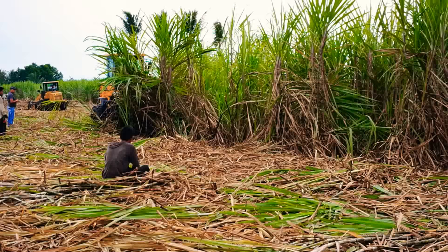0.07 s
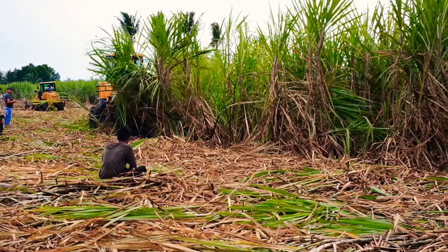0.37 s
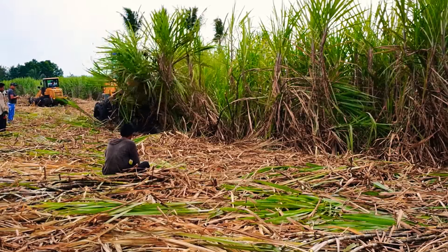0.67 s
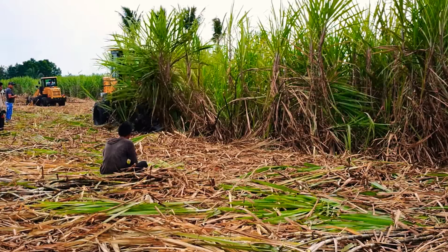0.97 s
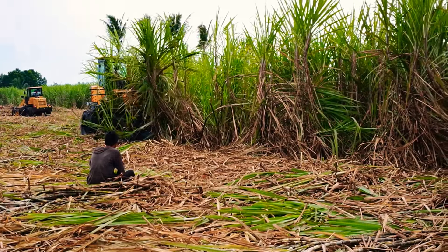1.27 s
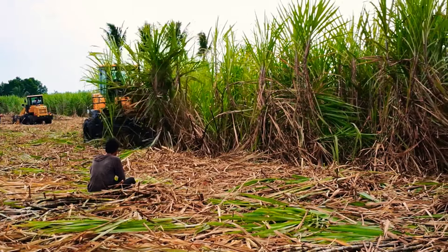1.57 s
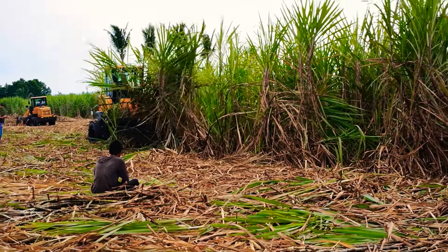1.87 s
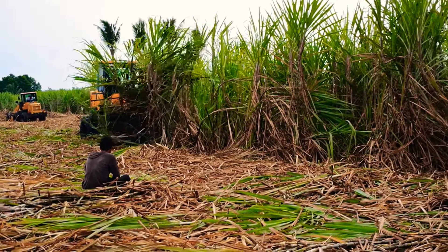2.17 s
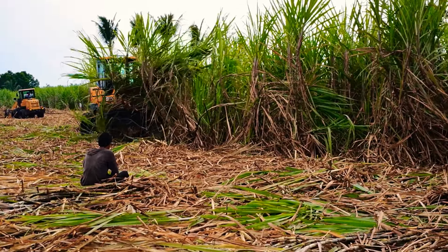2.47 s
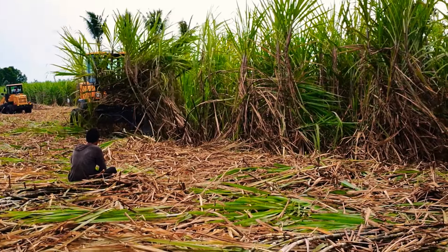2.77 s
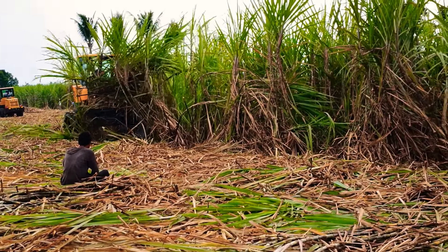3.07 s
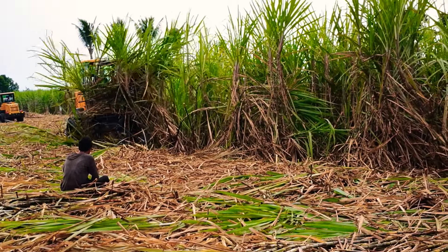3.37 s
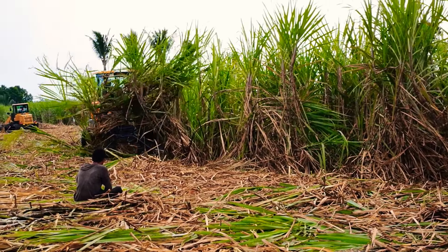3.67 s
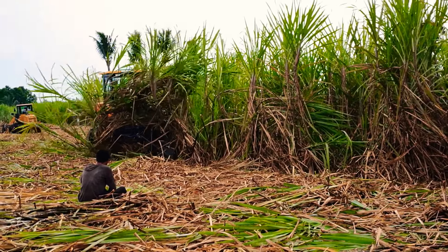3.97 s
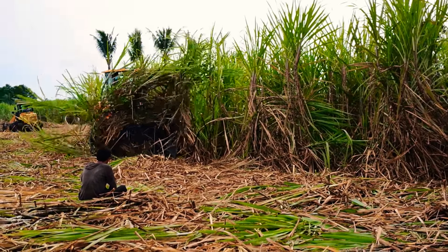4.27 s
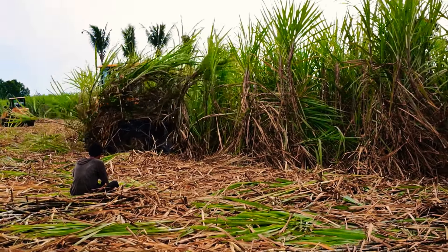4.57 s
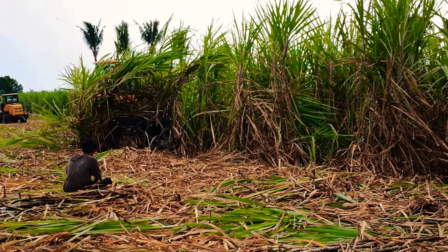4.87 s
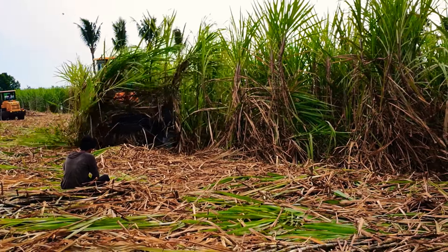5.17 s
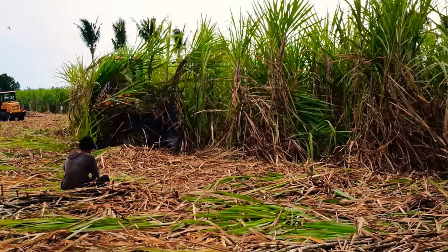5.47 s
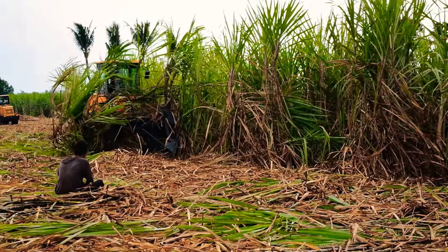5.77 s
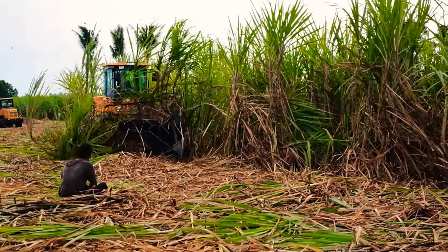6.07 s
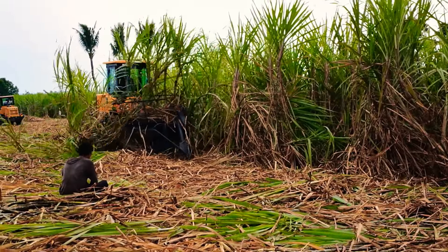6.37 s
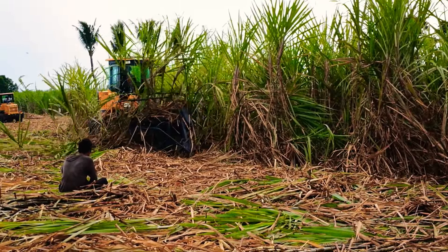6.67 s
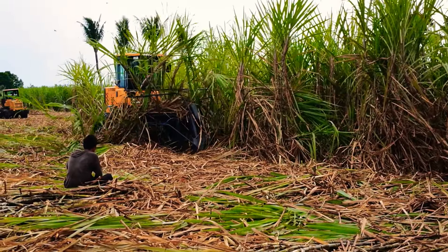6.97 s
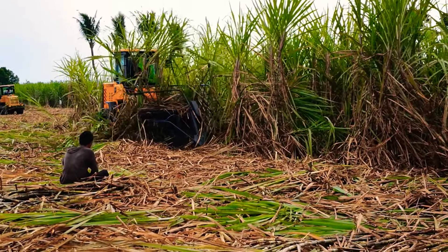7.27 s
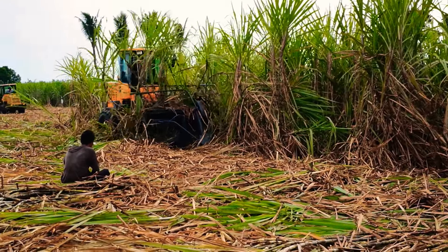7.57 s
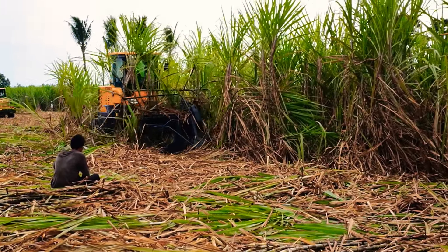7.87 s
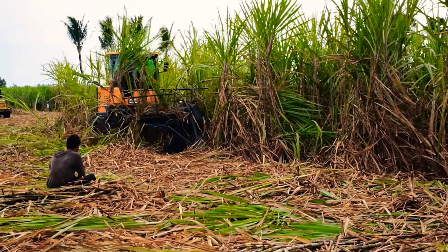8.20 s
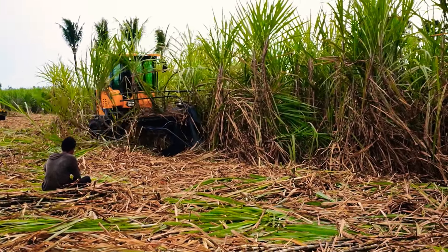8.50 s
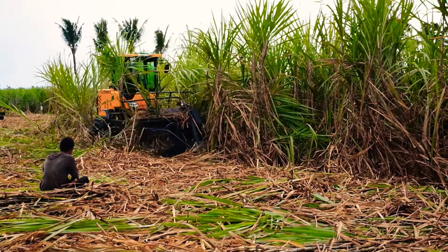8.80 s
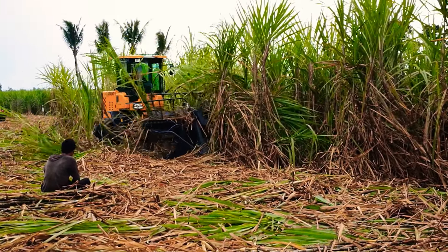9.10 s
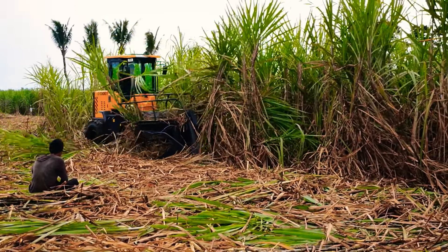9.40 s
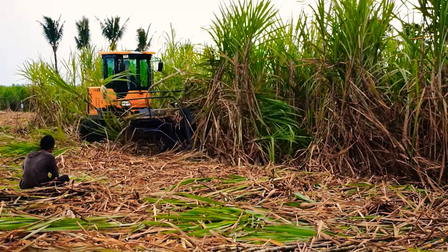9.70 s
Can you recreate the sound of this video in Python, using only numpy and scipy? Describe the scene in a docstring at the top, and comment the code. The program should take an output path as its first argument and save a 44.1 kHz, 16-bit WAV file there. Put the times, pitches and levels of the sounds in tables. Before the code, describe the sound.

Outdoors, a short way from a harvester cutting cane, a low diesel drone fades in quickly and runs on. Brief rising squeaks sound in the first two seconds, followed by a faint pump whine. Throughout, brittle stalks snap irregularly over a hiss of tearing leaves, knocks and rattles on steel panels, and light metallic rings. A distant tractor's hum weakens while the harvester slowly nears.

```python
"""A sugarcane harvester fades in, its four-cylinder diesel droning at the firing rate, a tractor beyond.
In the first two seconds something rubs and squeaks. Then the machine clears the standing cane and
its hydraulic pump whines up. Throughout, billets drum on the steel feed housing, leaves tear in the
fan, stalks fracture with a snap, and now and then a blow rings the modes of a cutter blade.
By the end the harvester has crept closer and the tractor has receded."""
import sys
import numpy as np
from scipy import signal
from scipy.fft import rfft, irfft, next_fast_len
from scipy.io import wavfile

SR = 44100
rng = np.random.default_rng(int(sys.argv[2]) if len(sys.argv) > 2 else 0)


def unload_wav(signal):
    """Save mono or channel-first audio to the path in sys.argv[1] as 16-bit WAV at rate SR, clipped to [-1, 1]."""
    wavfile.write(
        sys.argv[1],
        SR,
        np.round(np.clip(np.atleast_2d(signal).T, -1, 1) * 32767).astype(np.int16),
    )


N = 429534
FFT_SIZE = next_fast_len(N, True)


def from_db(db):
    """Decibels to amplitude ratio."""
    return 10 ** (np.asarray(db) / 20)

def unit_rms(x):
    """Normalisation to unit power."""
    return x / np.sqrt(np.mean(x ** 2) + 1e-20)

def in_time(rows):
    """Interpolation of each column at every sample."""
    s, *columns = np.transpose(rows)
    return [np.interp(np.arange(N) / SR, s, c) for c in columns]

def in_frequency(rows):
    """Interpolation of each column at every bin, along log frequency."""
    hz, *columns = np.transpose(rows)
    bins = np.fft.rfftfreq(FFT_SIZE, 1 / SR)
    return [np.interp(np.log(bins + 1), np.log(hz), c) for c in columns]

def filtered(x, response):
    """Linear filtering: the spectrum times a frequency response."""
    return irfft(rfft(x, FFT_SIZE) * response, FFT_SIZE)[..., :N]

def colour(x, spectrum):
    """Spectral shaping with one-octave skirts; white noise keeps its power."""
    skirted = [(spectrum[0][0] / 2, -70), *spectrum, (spectrum[-1][0] * 2, -70)]
    return filtered(x, unit_rms(from_db(in_frequency(skirted)[0])))

def resonance(x, hz, t60):
    """A damped mode, falling 60 dB in t60 seconds; white noise keeps its power."""
    r, w = from_db(-60 / (t60 * SR)), 2 * np.pi * hz / SR
    gain = np.sqrt((1 - r * r) / 2)
    return signal.lfilter([gain, 0, -gain], [1, -2 * r * np.cos(w), r * r], x)

def drift(corner_hz):
    """Slow fluctuation: low-passed noise of unit rms."""
    step, settling = 40, 2000
    r = np.exp(-2 * np.pi * corner_hz * step / SR)
    noise = rng.standard_normal(N // step + settling + 2)
    slow = signal.lfilter([1], [1, -2 * r, r * r], noise)[settling:]
    return np.interp(np.arange(N) / step, np.arange(len(slow)), unit_rms(slow))

def hiss():
    """Independent white noise on three paths: direct, scattered left, scattered right."""
    return rng.standard_normal((3, N))

def timed_hits(times, db):
    """Impulses of energy at given moments."""
    hits = np.zeros(N)
    hits[(np.asarray(times) * SR).astype(int)] = from_db(db) ** 2
    return hits

def random_hits(per_s, spread_db):
    """A Poisson stream of energy impulses of uneven size."""
    occurs = rng.random(N) < per_s / SR
    return occurs * from_db(spread_db * np.clip(rng.standard_normal(N), -2, 2)) ** 2

def decay(energy, t60, rise_s):
    """Amplitude envelope of energy impulses that build quickly and decay exponentially."""
    tail = signal.lfilter([1], [1, -from_db(-60 / (t60 * SR)) ** 2], energy + 1e-18)
    pole = np.exp(-1 / (rise_s * SR))
    return np.sqrt(signal.lfilter([1 - pole], [1, -pole], tail))

def grains(per_s, spread_db, t60, rise_s):
    """Shot noise: the unit-rms envelope of many small impacts."""
    return unit_rms(decay(random_hits(per_s, spread_db), t60, rise_s))

def phase(hz):
    """Phase angle as the integral of frequency."""
    return 2 * np.pi * np.cumsum(hz) / SR

def partial(angle, order, waver_db):
    """A sinusoid at a multiple of a base rate, wavering about unit rms."""
    tone = np.sqrt(2) * np.sin(order * angle + rng.uniform(0, 2 * np.pi))
    return tone * from_db(waver_db * drift(3.0))


# Each row: time in seconds, firing rate in Hz.
TRACTOR_RATE = [(0, 80.5), (1, 80.2), (2.5, 79.4), (4, 78.3), (5.2, 77.6), (6.5, 77.9), (9.74, 77.8)]
# Each row: multiple of the firing rate, relative level in dB.
TRACTOR_HARMONICS = [(1, -3), (2, -21), (3, -6.5), (4, -17.5), (5, -18)]

def tractor(first_db=-39.0, last_db=-46.0, dulling_db=-2.0):
    """Periodic firing gives a harmonic hum; growing distance takes the upper harmonics first."""
    angle = phase(in_time(TRACTOR_RATE)[0])
    away = np.linspace(0, 1, N)
    hum = sum(from_db(db + dulling_db * (k - 1) * away) * partial(angle, k, waver_db=2.0)
              for k, db in TRACTOR_HARMONICS)
    return from_db(first_db + (last_db - first_db) * away) * hum


# Each row: time in seconds, crankshaft turns per second.
CRANK_RATE = [(0, 25.2), (.5, 25.55), (1.0, 26.0), (1.35, 25.8), (2.1, 27.1), (3.0, 27.2), (4.2, 27.0),
              (4.8, 27.25), (5.6, 27.1), (6.4, 27.0), (6.9, 26.6), (7.7, 26.85), (8.3, 26.7), (8.9, 26.8),
              (9.3, 27.0), (9.74, 26.75)]
# Each row: time in seconds, then relative levels in dB of the firing note, its twelfth and the rumble.
ENGINE_EFFORT = [(0.35, -40.5, -37, -42), (0.9, -36.5, -38, -39), (1.6, -35, -39.5, -41.5),
                 (2.4, -36.5, -39.4, -39.5), (2.85, -39, -42, -42), (3.45, -36.5, -44.5, -40),
                 (4.0, -36, -42, -41.5), (4.4, -39.5, -45.5, -45), (5.2, -39, -45.5, -41.5),
                 (5.95, -40, -39.5, -43.5), (6.35, -40.5, -46.5, -41), (6.9, -37, -43, -41),
                 (7.5, -38.5, -42, -42), (8.15, -39.5, -37, -41.5), (8.7, -34, -35, -38.5),
                 (9.15, -39.5, -40, -42.5), (9.74, -40, -38, -42.5)]
# Weaker partials. Each row: multiple of the crank rate, level in dB against the rumble column.
WEAK_ORDERS = [(6.5, -12.5), (7, -9), (7.5, -10.5), (8, -8.5)]
# Exhaust noise. Each row: frequency in Hz, relative spectral density in dB.
EXHAUST_SPECTRUM = [(20, -24), (35, -9), (50, -6), (75, -5), (110, -2), (140, -1.5), (185, 2.5), (222, -1),
                    (255, -6), (310, -10), (350, -13.5), (470, -17.5), (900, -14.5)]

def diesel(octave_db=-38.5, octave_follows=0.55, puff_depth=0.19):
    """Two firings a turn give the drone and modulate the exhaust noise into puffs."""
    angle = phase(in_time(CRANK_RATE)[0])
    firing_db, twelfth_db, rumble_db = in_time(ENGINE_EFFORT)
    swing_db = firing_db - firing_db.mean()
    drone = from_db(firing_db) * partial(angle, order=2, waver_db=0.5)
    drone += from_db(octave_db + octave_follows * swing_db) * partial(angle, order=4, waver_db=0.9)
    drone += from_db(twelfth_db - 1) * partial(angle, order=6, waver_db=1.0)
    drone += sum(from_db(rumble_db + db) * partial(angle, k, waver_db=2.5) for k, db in WEAK_ORDERS)
    puffs = hiss() * (1 + puff_depth * np.cos(2 * angle))
    return drone, from_db(rumble_db + 1) * colour(puffs, EXHAUST_SPECTRUM)


# Each row: time in seconds, relative level in dB.
PUMP_LOAD = [(0, -54), (2.1, -53), (2.3, -42.5), (3.2, -46), (4.0, -44), (4.7, -53), (6.2, -51), (9.0, -53),
             (9.74, -45)]

def pump():
    """Gearing ties the hydraulic pump's unsteady whine to a high order of the crankshaft."""
    angle = phase(in_time(CRANK_RATE)[0] * (1 + .0075 * drift(45)))
    return from_db(in_time(PUMP_LOAD)[0]) * partial(angle, order=50, waver_db=1.5)


# Each row: frequency in Hz, relative level in dB, t60 in seconds.
PANEL_MODES = [(770, -5.5, .1), (922, 0, .12)]

def panels(knock_energy, flow, ring_db=26.5, stray_db=-3.5):
    """Impulse response: knocks and lighter stray billets ring the housing panels."""
    stray_energy = random_hits(per_s=12, spread_db=2) * (flow * from_db(stray_db)) ** 2
    blows = from_db(ring_db) * np.sqrt(knock_energy + stray_energy)
    return sum(from_db(db) * resonance(blows + 1e-18, hz, t60) for hz, db, t60 in PANEL_MODES)


# Cane passing through the housing. Each row: time in seconds, relative level in dB.
CANE_FLOW = [(0.3, -29), (0.45, -30.5), (0.8, -31.5), (1.25, -31), (2.15, -34), (2.3, -31), (3.2, -35),
             (3.62, -33), (4.2, -34.5), (4.65, -38.5), (5.4, -35), (6.1, -35.5), (6.35, -33), (6.7, -35),
             (8.0, -36), (8.55, -33.5), (9.25, -36.5), (9.74, -38.5)]
# Each row: start in seconds, relative peak level in dB.
BILLET_KNOCKS = [(0.324, -30), (0.404, -27.5), (0.988, -32), (1.048, -30), (1.127, -30.5), (1.207, -30),
                 (1.275, -28.5), (1.59, -29), (2.259, -27), (2.41, -29.5), (3.582, -27.5), (3.695, -32.5),
                 (5.368, -32), (6.101, -34), (6.351, -31.5), (6.442, -32.5), (7.214, -35), (7.508, -32.5),
                 (7.894, -39), (8.102, -33), (8.521, -34), (9.467, -30.5), (9.669, -32.5)]
# Each row: frequency in Hz, relative spectral density in dB.
HOUSING_SPECTRUM = [(380, -17.5), (470, -15), (560, -11.5), (660, -7.5), (760, -3.5), (830, -4), (930, -2),
                    (1090, -9), (1200, -5), (1330, -2), (1540, -2.5), (1750, -9), (1950, -7.5),
                    (2200, -12.5), (2550, -9.5), (5000, -15)]

def feed_housing(clatter_db=-2.0, knock_db=2.5):
    """Forced vibration: rollers and tumbling billets drive the broad resonances of a steel housing."""
    clatter = from_db(clatter_db) * grains(per_s=70, spread_db=0.5, t60=0.2, rise_s=0.0012)
    flow = from_db(in_time(CANE_FLOW)[0])
    times, db = np.transpose(BILLET_KNOCKS)
    knocks = decay(timed_hits(times, db + knock_db), t60=0.19, rise_s=0.0012)
    roar = flow * np.hypot(1, clatter)  # incoherent sounds add in power
    out = colour(hiss() * np.hypot(roar, knocks), HOUSING_SPECTRUM)
    out[0] += panels(timed_hits(times, db), flow)  # direct path only
    return out


# Each row: start and length in seconds, first pitch in Hz, rise in Hz per second, relative level in dB.
SQUEAK_GLIDES = [(0.238, 0.15, 2320, 1920, -29.5), (1.09, 0.11, 2390, 1100, -34),
                 (1.612, 0.072, 2540, 1500, -30), (1.658, 0.091, 3600, 1190, -31)]

def squeaks(waver_db=3.0, jitter=.009):
    """Friction in the machine excites short whistles that swell and rise."""
    out = np.zeros((3, N))
    unsteady = 1 + jitter * drift(56)
    strength = from_db(waver_db * drift(25))
    for s, length, hz, rise, db in SQUEAK_GLIDES:
        t = np.arange(int(length * SR)) / SR
        span = slice(int(s * SR), int(s * SR) + len(t))
        swell = from_db(db) * strength[span] * np.sqrt(np.sin(np.pi * t / length))
        angle = phase((hz + rise * t) * unsteady[span])
        out[:, span] += swell * np.sin(angle + rng.uniform(0, 2 * np.pi, (3, 1)))
    return out


# Leaves passing through the extractor. Each row: time in seconds, relative level in dB.
LEAF_FLOW = [(0.3, -34), (0.5, -31.5), (2.1, -35), (2.3, -33), (3.8, -32.5), (4.75, -38), (5.4, -31.5),
             (6.35, -34), (7.9, -36), (8.55, -34), (9.74, -35.5)]
# Each row: frequency in Hz, relative spectral density in dB.
LEAF_SPECTRUM = [(1200, -8.5), (2200, -14), (2500, 2.5), (2780, -8), (3080, 2), (3400, -5.5), (3660, 4),
                 (4100, -0.5), (4450, -1), (5400, -4.5), (7200, -4.5), (7850, -9), (8400, -7.5),
                 (10200, -10), (12000, -16), (15700, -27.5)]

def shredding(rush_db=-0.5):
    """Modulated noise and its envelope: leaves rush through the fan and fibres tear in bursts."""
    bursts = grains(per_s=55, spread_db=1.7, t60=.1, rise_s=.002)
    fibres = grains(per_s=3000, spread_db=5.0, t60=0.014, rise_s=.0001)
    envelope = from_db(in_time(LEAF_FLOW)[0]) * np.hypot(from_db(rush_db), bursts * fibres)
    return colour(hiss() * envelope, LEAF_SPECTRUM), envelope

def chopping(chop_db=-10.0):
    """Length sets pitch: unequal billets leave the chopper, each with a damped woody clack."""
    clacks = 0
    for hz in np.geomspace(3050, 4500, num=7):
        blows = grains(per_s=4, spread_db=1.5, t60=.04, rise_s=.001)
        clacks += resonance(hiss() * blows, hz, t60=.014)
    return from_db(in_time(LEAF_FLOW)[0] + chop_db) * unit_rms(clacks)


# Each row: frequency in Hz, relative level in dB, t60 in seconds.
BLADE_MODES = [(4800, -8, .07), (5745, -8, .08), (6380, -10, .06), (7200, -4, .075), (8300, -7, .08),
               (10050, -3, .08), (10750, -6, .08), (11220, -4, .075), (12400, -8, .07), (13970, -8, .06)]
# Each row: start in seconds, relative level in dB, tilt in dB per octave, favoured mode in Hz.
BLADE_BLOWS = [(.243, -30, -8, 7200), (1.411, -30, -14, 4800), (1.675, -34, -8, 4800),
               (2.241, -35, 5, 7200), (3.074, -34, -8, 13970), (3.279, -38, -14, 4800),
               (3.4575, -38, -6, 4800), (3.832, -38, -3, 10050), (4.043, -33.5, -9, 7200),
               (4.23, -22, 4, 8300), (4.426, -32.5, 2, 10050), (4.7087, -41, -4, 10050),
               (5.36, -36, -9, 7200), (5.754, -31, -8, 13970), (7.108, -29, -9, 4800),
               (7.964, -33.5, -10, 11220), (8.574, -30.5, -15, 5745), (8.972, -25, -5, 10050),
               (9.165, -35, 1, 7200), (9.195, -36, -7, 10050)]

def blade(ping_db=1.5, favour_db=3.5, uneven_db=3.0, detune=.006, pivot_hz=9000):
    """Free vibration: a blow scrapes a steel blade, and its modes ring as detuned, beating pairs."""
    times, blows_db, _, _ = np.transpose(BLADE_BLOWS)
    scrape_spectrum = [(hz, db - 6 * max(0, np.log2(hz / pivot_hz))) for hz, db, _ in BLADE_MODES]
    out = colour(hiss(), scrape_spectrum) * decay(timed_hits(times, blows_db), t60=0.074, rise_s=.0003)
    t = np.arange(SR // 5) / SR
    attack = 1 - np.exp(-t / .001)
    for s, blow_db, tilt, favoured_hz in BLADE_BLOWS:
        span = slice(int(s * SR), int(s * SR) + len(t))
        for hz, mode_db, t60 in 2 * BLADE_MODES:
            favoured = abs(hz / favoured_hz - 1) < .04
            db = blow_db + ping_db + mode_db + tilt * np.log2(hz / pivot_hz)
            db += favour_db * favoured + rng.uniform(-uneven_db, uneven_db)
            detuned_hz = hz * (1 + detune * rng.standard_normal())
            angle = 2 * np.pi * (detuned_hz * t + rng.random((3, 1)))
            out[:, span] += attack * from_db(db - 60 * t / t60) * np.sin(angle)
    return out

def blade_tinkle(crop, touch_db=-18.5, t60_share=0.5):
    """Contact damping: passing crop excites the blades faintly and shortens their ring."""
    contact, out = hiss(), 0
    for hz, db, t60 in BLADE_MODES:
        touches = 7000 / hz * crop * grains(per_s=14, spread_db=2.2, t60=.06, rise_s=.001)
        out += from_db(touch_db + db) * resonance(contact * touches, hz, t60 * t60_share)
    return out


# Each row: start in seconds, relative peak level in dB, treble against that level in dB,
# ring of the stalk in Hz, t60 of the break in seconds.
STALK_BREAKS = [(0.195, -7, -21, 3560, 0.068), (0.348, -11, -28, 3250, 0.069),
                (.4384, -14, -25, 3280, 0.064), (.452, -14.5, -14, 3430, 0.33),
                (.572, -7.5, -35, 3800, 0.13), (1.387, -17, -13, 2930, .22),
                (1.577, -8.5, -20, 4300, 0.091), (2.2103, -10, -20, 4400, 0.07),
                (2.358, -2, -43, 3800, 0.063), (2.411, -7, -29, 4180, .075), (2.6062, -6, -24, 4350, 0.061),
                (2.6394, -14.5, -14, 4500, .2), (2.672, -9.5, -26, 3770, 0.15),
                (2.7535, -8.5, -26, 3870, 0.081), (3.3523, -9, -31, 3750, 0.06),
                (3.4575, -14, -25, 3120, .09), (3.826, -10.5, -13, 3200, .14),
                (3.939, -11.5, -29, 3500, 0.16), (4.132, -8, -24, 3500, 0.14), (4.231, -18, -7, 3060, 0.18),
                (4.4147, -15, -22, 3560, 0.16), (4.588, -22, -10, 3610, 0.25),
                (4.9634, -17.5, -8.5, 3570, 0.38), (5.359, -19, -19, 3000, 0.18),
                (5.9085, -14, -22, 3550, 0.094), (6.0203, -13.5, -16, 3850, .08),
                (6.348, -17.5, -8.5, 3700, 0.33), (6.688, -13, -26, 3440, 0.067),
                (6.7625, -21.5, -8, 4900, .08), (6.915, -18.5, -12, 3700, 0.077),
                (7.1048, -17, -18, 3700, .08), (7.2544, -17, -30, 3670, 0.074),
                (7.364, -18, -13, 3650, .08), (7.58, -14, -16.5, 3440, .1),
                (8.101, -14.5, -14.5, 3830, 0.12), (8.138, -16, -7.5, 3120, 0.18),
                (8.446, -14, -11, 3140, 0.11), (8.59, -13, -14, 3960, 0.081),
                (8.8707, -11, -16.5, 5170, 0.067), (8.971, -16.5, -19, 3650, 0.091),
                (9.0614, -8.5, -25, 3570, 0.048), (9.144, -13.5, -17, 3700, 0.06),
                (9.2704, -13, -32, 3900, .07), (9.3885, -11, -12, 3650, 0.061),
                (9.53, -16, -14, 4020, 0.08)]
# Each row: frequency in Hz, relative spectral density in dB.
SPLINTER_SPECTRUM = [(500, -28), (1400, 5), (2200, 7), (3100, 10), (3800, 1), (4700, 7.5), (5600, 2.5),
                     (9000, 0), (11500, -12), (15700, -49)]

def stalk_snaps(snap_db=-20.0, edge_db=6.5, treble_hz=6000, ring_db=-13.5):
    """Brittle fracture: a stalk fails in a run of fibre cracks and rings; dry ones are brighter."""
    times, db, treble_db, _, _ = np.transpose(STALK_BREAKS)
    cracks = hiss() * grains(per_s=8500, spread_db=2.5, t60=0.01, rise_s=.0001)
    splinters = colour(cracks, SPLINTER_SPECTRUM)
    edge = signal.sosfilt(signal.butter(2, treble_hz, "high", fs=SR, output="sos"), splinters)
    out = -edge * decay(timed_hits(times, db + treble_db + edge_db), t60=0.14, rise_s=0.0009)
    for s, level_db, _, hz, t60 in STALK_BREAKS:
        envelope = decay(signal.unit_impulse(SR // 8), t60, rise_s=.0004)
        span = slice(int(s * SR), int(s * SR) + len(envelope))
        snap = splinters[:, span] * envelope
        ring = resonance(cracks[:, span] * envelope, hz, t60=0.006)
        for part, part_db in ((snap, snap_db), (ring, ring_db)):
            unit_energy = part / np.linalg.norm(part, axis=1, keepdims=True)
            out[:, span] += from_db(level_db + part_db) * np.linalg.norm(envelope) * unit_energy
    return out


# Each row: centre in Hz, width in Hz, share of amplitude removed from 0 to 1.
THROAT_NOTCHES = [(2185, 120, .74), (2710, 200, .45), (3380, 150, .5), (4090, 170, .45), (6950, 250, .25),
                  (7800, 300, .6)]

def throat(x):
    """Antiresonance: the hollow steel feed throat swallows narrow bands."""
    for hz, width_hz, share in THROAT_NOTCHES:
        x = x - share * signal.lfilter(*signal.iirpeak(hz, hz / width_hz, fs=SR), x)
    return x


# Each row: time in seconds, share hidden behind cane from 0 to 1, ground echo lag in seconds.
LINE_OF_SIGHT = [(0, 1, .00147), (1.3, 1, .00148), (2.2, .3, .00155), (6, 0, .00156), (9.74, 0, .001565)]
# Transmission through standing cane. Each row: frequency in Hz, gain in dB.
CANE_SCREEN = [(400, -8), (600, -5.5), (900, 2.5), (1150, -4.5), (1550, 0), (1900, -5), (2450, -2.5),
               (2950, -5.5), (3380, 2.5), (3650, -6), (3980, 3), (4250, -4), (4650, -1), (6250, -4),
               (8000, 0)]

def across_field(paths, echo_db=-16.5, echo_from_hz=3800):
    """Cane screens the machine until its throat is in view; a ground echo comb-filters the treble."""
    hidden, lag = in_time(LINE_OF_SIGHT)
    screened = filtered(paths, from_db(in_frequency(CANE_SCREEN)[0]))
    paths = hidden * screened + (1 - hidden) * throat(paths)
    treble = filtered(paths, in_frequency([(echo_from_hz, 0), (echo_from_hz * np.sqrt(2), 1)])[0])
    now = np.arange(N)
    echo = np.array([np.interp(now - lag * SR, now, path) for path in treble])
    return paths + from_db(echo_db) * echo


# Each row: frequency in Hz, left over right in dB, left phase lead in radians, coherence from 0 to 1.
MICROPHONE_PORTS = [(100, -1, 0.5, 1), (302, -4.5, 0.1, 0.81), (524, 1.5, 2.5, 0.6), (562, 10, 0, 0.73),
                    (715, 0.5, 0.76, 0.99), (953, -6.5, -1.1, 0.72), (1020, 3.5, 2.5, 0.68),
                    (1324, 1.5, -0.14, 1), (1640, -12.5, 1, 0.86), (1804, 0.5, 2.5, 0.54),
                    (2250, -1, 0.5, 0.92), (2570, 7, 2.5, 0.54), (2720, -14, 9.5, 0.3),
                    (2790, 6.5, 7, 0.97), (3450, -6, 6, 0.68), (3680, 0.5, 7, 1), (3980, -17, 7, 0.87),
                    (4260, -8, 6.5, 0.91), (4920, -2.5, 8, 0.77), (5760, -9.5, 9, 0.48),
                    (6020, -2, 8.5, 0.7), (6540, -14, 9.5, 0.4), (7020, 1.5, 9, 0.72), (7210, -9, 12, 0.87),
                    (7700, -7, 11.5, 0.44), (8400, -5.5, 14, 1), (9700, -6, 14.5, 0.2),
                    (11740, -2, 17, 0.69), (16000, 2, 16.5, 0.2)]

def microphones(paths):
    """Partial coherence: direct sound reaches two ports with a lag; scattered sound differs in each."""
    balance_db, lead, coherence = in_frequency(MICROPHONE_PORTS)
    sides = np.array([[.5], [-.5]])
    gain = from_db(sides * balance_db)
    gain /= np.sqrt(np.mean(gain ** 2, axis=0))
    direct = filtered(paths[0], gain * np.sqrt(coherence) * np.exp(1j * sides * lead))
    scattered = filtered(paths[1:], gain * np.sqrt(1 - coherence))
    return direct + scattered


def scene(far_db=-3.5, approach_db_per_s=0.88):
    """Superposition in the open field; pump, feed and cutting grow louder as the harvester nears."""
    drone, rumble = diesel()
    leaves, crop = shredding()
    cutting = leaves + chopping() + stalk_snaps() + blade() + blade_tinkle(crop) + squeaks()
    machine = across_field(feed_housing() + cutting)
    nearness = from_db(far_db + approach_db_per_s * np.arange(N) / SR)
    return drone + nearness * pump() + tractor() + microphones(rumble + nearness * machine)

def record(dry, start_s=0.12, first_gain=0.073, fade_s=0.24, cutoff_hz=15800):
    """A linear fade brings the sound up, and a steep low-pass limits its bandwidth."""
    since = np.arange(N) / SR - start_s
    fade = np.where(since < 0, from_db(-73), np.clip(first_gain + since / fade_s, 0, 1))
    return signal.sosfilt(signal.ellip(12, .1, 90, cutoff_hz, fs=SR, output="sos"), dry * fade)


dry = scene()
out = record(dry)
unload_wav(out)
```